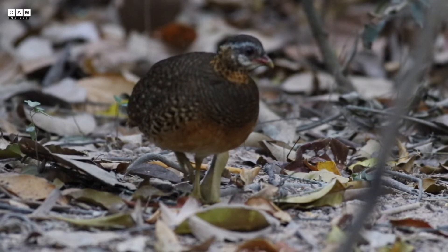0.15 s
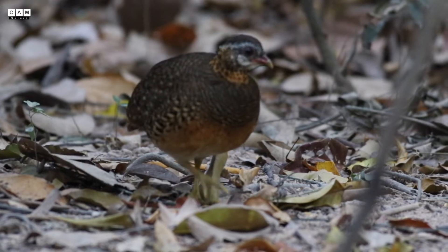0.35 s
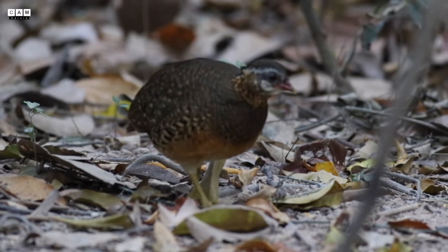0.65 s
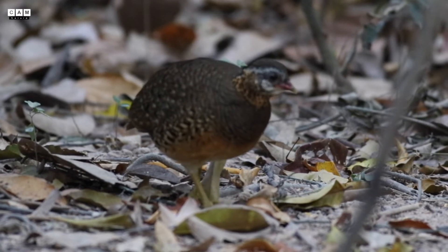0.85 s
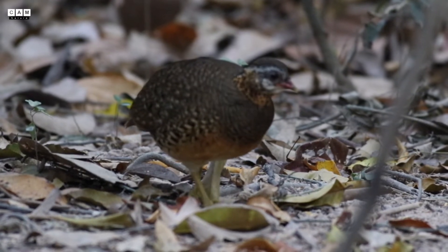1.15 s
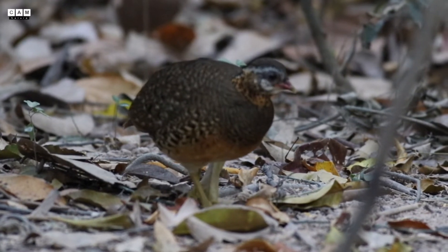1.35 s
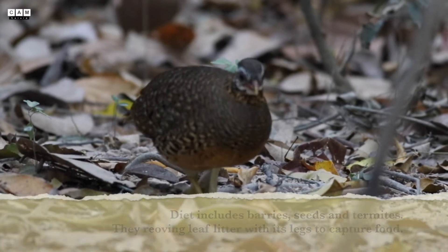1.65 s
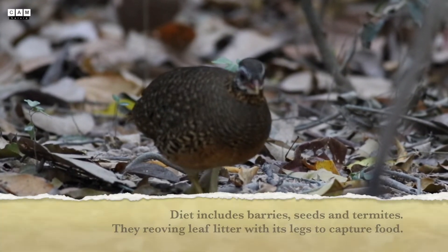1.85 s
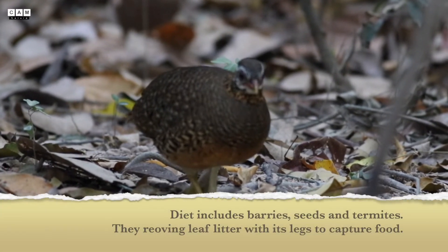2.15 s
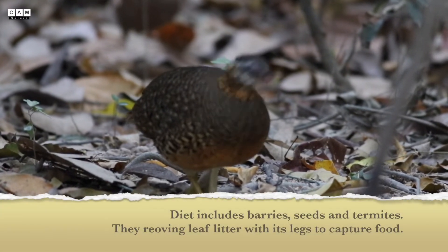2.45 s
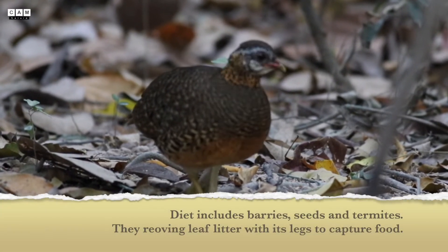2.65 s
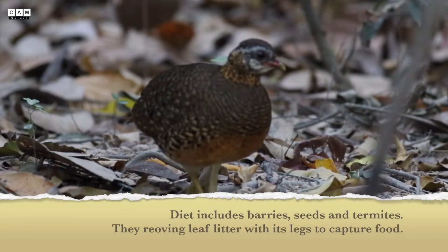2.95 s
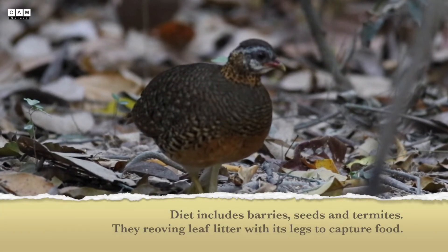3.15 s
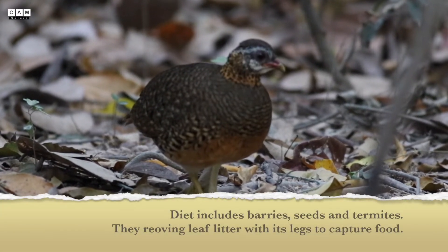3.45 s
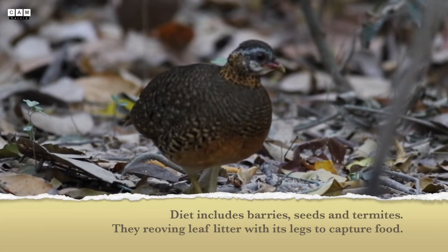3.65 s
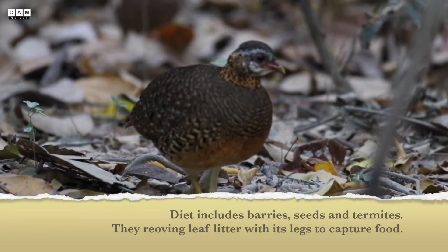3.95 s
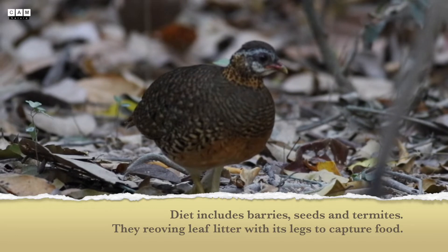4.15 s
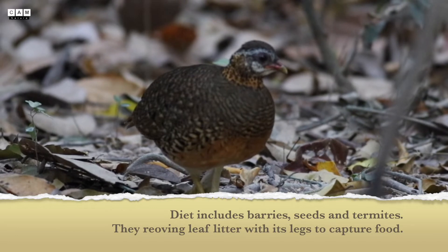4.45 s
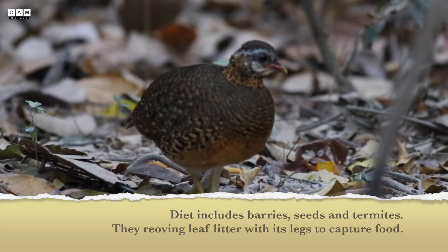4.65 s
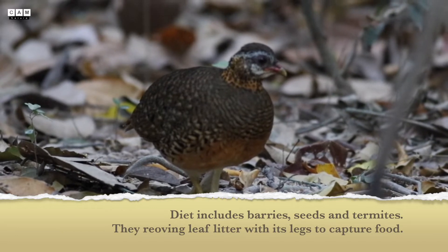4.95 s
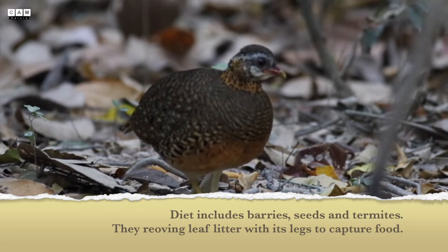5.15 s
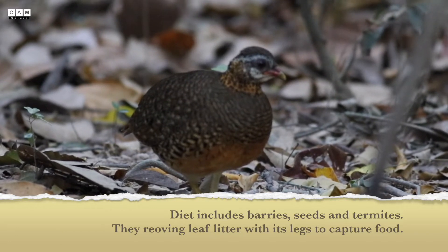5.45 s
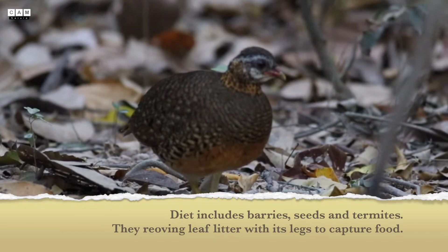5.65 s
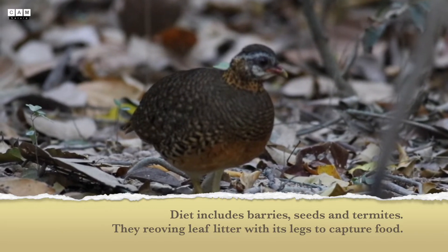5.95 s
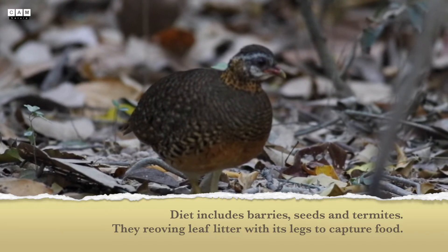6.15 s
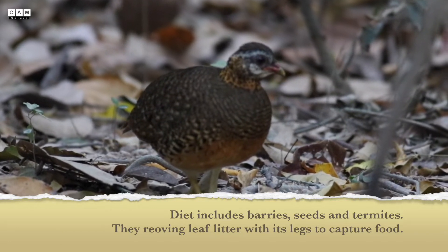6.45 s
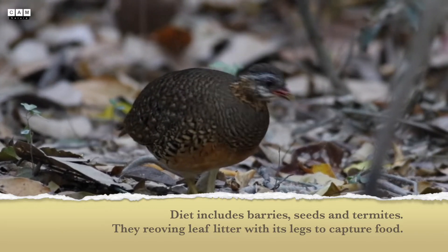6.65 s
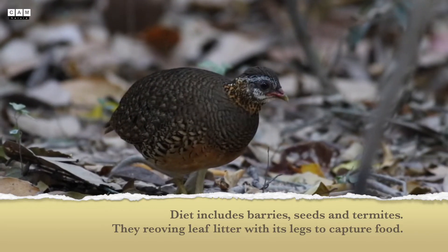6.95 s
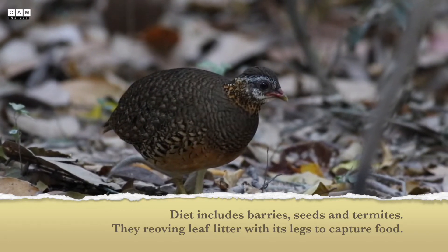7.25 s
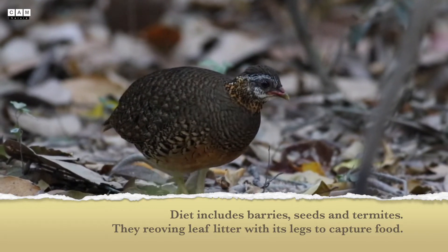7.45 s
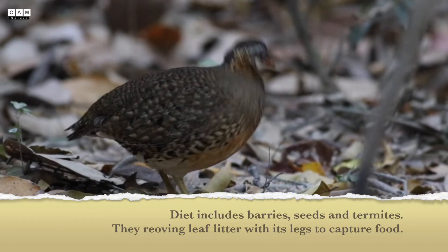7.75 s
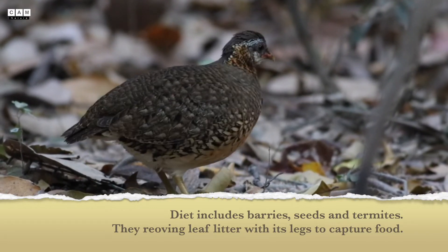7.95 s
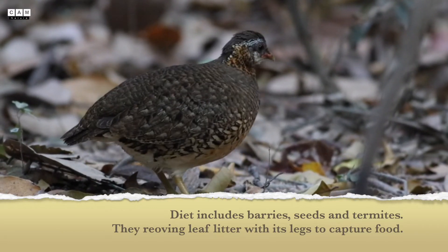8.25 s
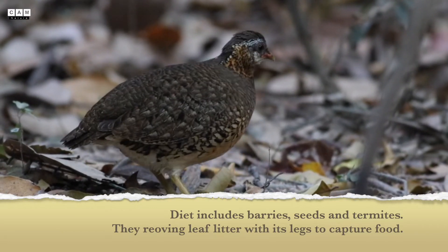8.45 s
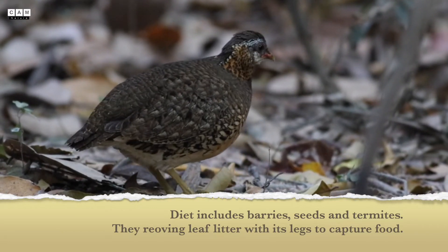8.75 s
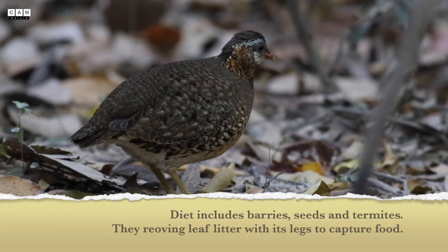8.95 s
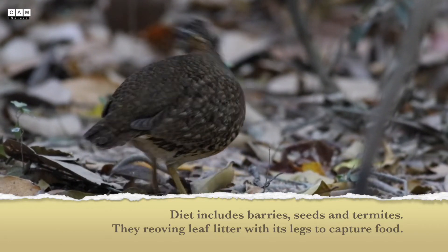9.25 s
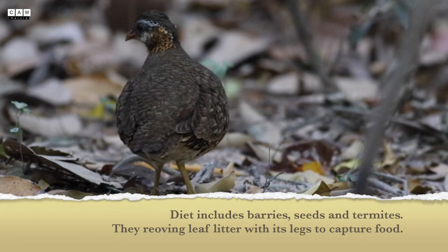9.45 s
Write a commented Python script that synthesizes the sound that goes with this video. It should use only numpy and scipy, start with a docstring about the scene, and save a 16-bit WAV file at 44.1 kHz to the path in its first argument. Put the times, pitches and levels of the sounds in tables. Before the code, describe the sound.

Birds call in quick short notes throughout, echoing in dense forest over a soft low rumble of air and a faint whine of far insects. A near bird whistles six low two-note phrases between 0.3 and 4.8 seconds, then three slightly higher pairs from 5.2 to 6.4. Others answer with hoarse slurs, gliding whistles and chirps. A high rising and falling sweep sounds at the start and at 3.5 seconds. Distant rasps and chatter thicken around 5.5 to 7.3 seconds. A high, rapidly pulsing insect whine swells from about 1 second, holds steady and stops dead at 7. Dry leaves snap close by, sharpest at about 2 and 3.4 seconds, with another clear snap near 5, among soft taps and faint high hisses. Scattered whistles, chirps and light taps continue, thinning toward the end at about 9.5 seconds.

```python
"""Songbirds call back and forth in dense forest: low whistled pairs, harsher slurs and high sweeps.
Whistles are gliding, nearly pure tones, rasps are noise in a throat resonance, and the trunks scatter
them all. An insect pulses near 7 kHz, once a wing stroke, and stops dead, leaving a far chorus.
Dry leaf litter snaps and taps close by; faint high hisses come and go over a low rumble of air."""
import sys
import numpy as np
from scipy import signal
from scipy.fft import rfft, irfft, next_fast_len
from scipy.io import wavfile
from scipy.ndimage import uniform_filter1d

SR = 44100
rng = np.random.default_rng(int(sys.argv[2]) if len(sys.argv) > 2 else 0)


def log_audio(samples):
    """Write samples as a 16-bit WAV file to the path given in sys.argv[1]."""
    # one column per channel
    frames = np.atleast_2d(samples).T
    # limit to full scale, then quantise
    limited = np.clip(frames, -1, 1)
    pcm = np.round(limited * 32767).astype(np.int16)
    wavfile.write(sys.argv[1], SR, pcm)


N = 422919
TIME = np.arange(N) / SR


# Two-note motifs, low (sinking, lifted) and high (rising, held), before each call retunes them:
# delay/s, length/s, f/Hz at four even steps through the note, relative level/dB
LOW_MOTIF = [(0, .135, 1275, 1155, 1150, 1024, 0), (0.139, .108, 1336, 1520, 1510, 1410, 1.5)]
HIGH_MOTIF = [(0, .08, 1313, 1427, 1462, 1390, -1.5), (.097, .09, 1567, 1594, 1526, 1530, 0.85)]
# Low calls: t/s, pitch factor of note one, of note two, level/dB before trim
LOW_CUES = [(.26, 1.12, 0.99, -43), (1.055, 0.96, 0.97, -42.5), (1.98, 1, 0.97, -43.5),
            (2.5, 0.97, 0.95, -43), (3.53, 1.015, 1.02, -43), (4.49, 0.99, 0.96, -43)]
# High calls: t/s, pitch factor, level/dB before trim
HIGH_CUES = [(5.215, 1, -40), (5.705, 1, -40.5), (6.2, 0.99, -40.5)]

def whistler():
    """The lead voice: a near bird whistles clean pairs of notes."""
    notes = phrases(LOW_CUES, LOW_MOTIF) + phrases(HIGH_CUES, HIGH_MOTIF)
    voice = song(notes, waver=.016, flutter=.35, taper=.2, octave_db=-38)
    return forest(gain_of(-.7) * voice, wet_db=-7.5, near_db=-4, near_s=.028)


# Answering slurs: t/s, length/s, starting f/Hz, level/dB before trim
SLUR_CUES = [(.01, 0.096, 1770, -48.5), (0.132, 0.087, 1753, -51.5), (0.313, 0.13, 2100, -47.5),
             (1.557, 0.073, 1742, -52), (1.819, 0.1, 1743, -53), (2.51, 0.1, 1747, -52),
             (2.828, 0.1, 1810, -51), (3.087, 0.11, 1866, -50), (3.22, 0.087, 1855, -50.5),
             (3.576, 0.12, 1890, -53.5), (3.818, 0.095, 1815, -53), (4.144, 0.07, 1810, -49),
             (4.201, 0.069, 1781, -51.5), (4.728, 0.1, 1736, -50), (5.6, 0.068, 1710, -47),
             (6.231, 0.11, 1768, -53.5), (6.455, 0.075, 1795, -52.5), (6.959, 0.1, 1696, -52),
             (8.637, 0.093, 2036, -53.5)]

def answering_bird(dive_per_s3=153.6):
    """Each hoarse slur starts flat and loses pitch with the cube of time."""
    progress = np.linspace(0, 1, 4)
    notes = [(s, length, *(hz * (1 - dive_per_s3 * (progress * length) ** 3)), db)
             for s, length, hz, db in SLUR_CUES]
    voice = song(notes, waver=.0259, flutter=.28, taper=.025, octave_db=-41)
    return forest(gain_of(4) * voice, wet_db=-3.5, near_db=-5.5, near_s=.09)


# Canopy whistles: t/s, length/s, held f/Hz, starting offset/share of f, waver/share of f,
# level/dB before trim
GLIDE_CUES = [(0.068, 0.084, 2335, 0.04, 0.0082, -45.5), (0.612, 0.038, 2507, -0.13, 0.0097, -45),
              (0.697, 0.19, 2461, -0.18, .012, -45), (1.021, 0.17, 2104, -0.27, 0.023, -46),
              (1.86, 0.23, 2447, -0.074, 0.013, -46.5), (2.018, 0.077, 2260, 0.04, 0.016, -47.5),
              (2.395, 0.12, 1926, -0.049, .008, -52), (2.774, .18, 2434, -.2, .018, -45),
              (3.014, 0.21, 2207, -0.073, 0.0094, -45.5), (4.765, .12, 2482, 0.083, 0.014, -44),
              (4.877, 0.12, 1905, 0.23, 0.023, -48), (5.306, 0.077, 2144, 0.073, 0.029, -42),
              (5.633, 0.19, 1930, -0.066, .015, -50), (7.43, 0.19, 2300, -.11, 0.0076, -47.5),
              (7.5, 0.144, 4190, -0.04, 0.014, -50), (7.916, 0.15, 2100, 0.13, 0.016, -45.5),
              (8.257, 0.11, 2280, 0.031, 0.027, -42.5), (8.479, 0.18, 1849, -0.16, .025, -50.5),
              (8.528, 0.11, 3315, -0.0014, 0.009, -53)]

def canopy_glides(settle_s=.11):
    """Each whistle slides in from above or below and flattens out on its held pitch."""
    progress = np.linspace(0, 1, 7)
    notes, wavers = [], []
    for s, length, hz, offset, waver, db in GLIDE_CUES:
        slide = np.maximum(1 - progress * max(length / settle_s, 1), 0) ** 2
        notes.append((s, length, *(hz * (1 + offset * slide)), db))
        wavers.append(waver)
    voice = song(notes, waver=wavers, flutter=.35, taper=.17, octave_db=-32)
    return forest(gain_of(.13) * voice, wet_db=-4.5, near_db=-3, near_s=.05)


# Quick chirps: t/s, length/s, starting f/Hz, final f/Hz, level/dB before trim
CHIRP_CUES = [(0, 0.091, 2803, 2460, -44.5), (0.1, 0.03, 1527, 1253, -42.5),
              (1.543, 0.082, 1988, 3580, -45.5), (2.925, 0.041, 2965, 3280, -53),
              (3.289, 0.051, 1740, 1243, -41.5), (4.274, 0.039, 1668, 1210, -41),
              (6.64, 0.032, 2305, 1890, -48.5), (6.885, 0.052, 1980, 2190, -49),
              (6.938, 0.068, 1908, 2600, -45), (6.977, .032, 3045, 3450, -44.5),
              (7.209, 0.03, 3160, 3320, -48), (7.24, 0.046, 3107, 2420, -43),
              (7.338, 0.036, 2700, 2336, -48), (8.159, .065, 1633, 1346, -54.5),
              (8.542, 0.047, 3300, 2900, -46), (8.713, 0.068, 1765, 1426, -51.5)]

def chirps(bow=.12):
    """Each chirp leaps along a slight arch: falling ones speed up, rising ones ease off."""
    notes = [(s, length, start, (start + end) / 2 + bow * abs(end - start), end, db)
             for s, length, start, end, db in CHIRP_CUES]
    voice = song(notes, waver=.027, flutter=.23, taper=.091, octave_db=-24)
    return forest(gain_of(-.5) * voice, wet_db=-3.5, near_db=-1, near_s=.048)


# A long, high two-note sweep: columns as in LOW_MOTIF
ARCH_MOTIF = [(0, .22, 2850, 3267, 3430, 3347, -3), (.26, .235, 3300, 3156, 2927, 2510, 2)]
# Its calls: t/s, pitch factor, level/dB before trim
ARCH_CUES = [(-.025, 0.99, -49), (3.5, 0.97, -47)]

def canopy_arches():
    """A canopy bird sweeps up on one note and slowly down on the next."""
    notes = phrases(ARCH_CUES, ARCH_MOTIF)
    voice = song(notes, waver=.0048, flutter=.34, taper=.18, octave_db=-30, strain_s=.0006)
    return forest(gain_of(-1.4) * voice, wet_db=-3, near_db=1, near_s=.026)


# Hoarse churrs: t/s, length/s, centre f/Hz, level/dB before trim
CHURR_CUES = [(1.14, 0.035, 2680, -52.5), (2.17, 0.039, 2900, -56), (4.35, 0.041, 2340, -49.5),
              (4.44, 0.032, 2740, -48), (4.485, 0.048, 2130, -48), (4.89, 0.05, 2380, -48),
              (5.05, 0.12, 2360, -55.5), (7.02, .04, 3370, -51.5), (7.825, 0.034, 2690, -49.5),
              (7.85, 0.04, 2380, -49), (7.99, .07, 3650, -54), (8.46, 0.054, 1740, -52.5),
              (8.795, 0.034, 2830, -47.5), (9.065, 0.075, 2500, -57), (9.4, 0.048, 2460, -56.5)]

def churrs():
    """Short bursts of noise in one resonance of the throat."""
    return gain_of(4) * noise_bursts(CHURR_CUES, width_hz=167)


# A far bird's rasps: t/s, length/s, centre f/Hz, width/Hz, lower resonance/dB re the main one,
# level/dB before trim
BUZZ_CUES = [(0, .12, 4220, 480, 0, -46.5), (1.408, 0.14, 4190, 456, -0.5, -47.5),
             (2.118, 0.16, 4205, 502, 0, -47.5), (3.715, .15, 4080, 480, -1.5, -47),
             (5.586, 0.1, 4380, 400, 0, -48), (5.945, 0.13, 4150, 200, -2, -48),
             (6.111, 0.11, 4186, 223, -8, -46), (6.202, .12, 4760, 376, -1, -48),
             (6.339, 0.11, 4045, 230, -6, -44.5), (6.536, 0.11, 4070, 203, -5, -46.5),
             (6.755, .12, 3900, 193.4, -8, -46.5), (7.041, 0.118, 4070, 192, -2, -48),
             (7.947, .12, 4500, 396, -7, -47), (9.355, .13, 4200, 485, -3, -49.5)]

def buzzes(lower_ratio=.72, rise_widths=1.2):
    """A rasp swells and fades while its resonance, and a second one below it, climb."""
    out = np.zeros(N)
    for s, length, hz, width_hz, lower_db, db in BUZZ_CUES:
        progress = TIME[:int(length * SR)] / length
        phase = 2 * np.pi * np.cumsum(hz + rise_widths * width_hz * (progress - .5)) / SR
        main = band_noise(len(phase), 0, width_hz) * np.sin(phase)
        lower = gain_of(lower_db) * band_noise(len(phase), 0, width_hz) * np.sin(phase * lower_ratio)
        add(out, s, gain_of(db) * unit_rms((main + lower) * np.sin(np.pi * progress)))
    return gain_of(-6) * out


# The near insect's fader and pitch: t/s, level/dB, carrier f/Hz
INSECT_CURVE = [(0, -63, 6680), (0.801, -59.5, 6650), (1.198, -55, 6646), (2.1, -52.5, 6766),
                (3, -52.5, 6752), (6.99, -52.5, 6730)]
# Its wings hurry as it warms up and tire before it stops: t/s, stroke rate/Hz
STROKE_RATE = [(0, 42.6), (1.2, 42.6), (1.8, 42.35), (2.5, 42.88), (3.2, 42.7), (5, 42.6), (7, 42.25)]

def insect(stop_s=6.995, pulse_width=.09, sag_hz=1400):
    """One short pulse a wing stroke, its pitch sagging as it sounds."""
    s, db, hz = np.transpose(INSECT_CURVE)
    stroke = (np.cumsum(automation(STROKE_RATE)) / SR + .21) % 1 - .5  # zero at the pulse's peak
    unevenness = np.exp(.19 * band_noise(N, 0, 33))
    pulse = unit_rms(np.exp(-.5 * (stroke / pulse_width) ** 2) * unevenness)
    jitter = .3 * band_noise(N, 0, 130)
    pitch_hz = np.interp(TIME, s, hz) + 5 * band_noise(N, 0, 14) - sag_hz * stroke
    phase = 2 * np.pi * np.cumsum(pitch_hz) / SR + jitter
    tone = np.sqrt(2) * (np.sin(phase) + gain_of(-26) * np.sin(2 * phase))
    wing_scrape = gain_of(-23) * band_noise(N, 21400, 1000)  # lies above the final low-pass
    call = gain_of(np.interp(TIME, s, db)) * (pulse * tone + wing_scrape) * (TIME < stop_s)
    return forest(call, wet_db=-13, near_db=-10, near_s=.015)


# Dry leaf snaps: t/s, peak level/dB, body near 2 kHz/dB re the treble
SNAP_CUES = [(.328, -31, -14), (1.721, -37.5, -18), (2.023, -22, 3), (3.247, -37, -5), (3.368, -23.5, 11.5),
             (3.721, -44, -7), (3.844, -32, -6), (4.179, -32, 5), (4.379, -37, -12), (5.107, -28.5, -2),
             (5.54, -43, -12), (6.126, -37, -7), (7.418, -37.5, -16), (7.836, -39.5, -14)]
# Soft taps on the litter: t/s, peak level/dB, f/Hz
TAP_CUES = [(1.924, -38, 1070), (2.965, -45, 622), (3.368, -41, 870), (6.033, -43.5, 784),
            (6.787, -42.5, 850), (7.524, -46, 940), (7.93, -37.5, 780), (8.144, -39.5, 1000),
            (8.859, -46, 596), (9.15, -48, 930), (9.393, -41.5, 850)]

def litter(snap_s=.0016, crumble_s=.008, tap_s=.0036):
    """Leaves crack with a short crumble after; taps are dull, quickly damped knocks."""
    out, t = np.zeros(N), TIME[:SR // 10]
    decay = np.exp(-t / snap_s) + gain_of(-15) * np.exp(-t / crumble_s)
    for s, db, body_db in SNAP_CUES:
        treble = band_noise(len(t), 4880, 2320) + .14 * band_noise(len(t), 13000, 2500)
        body = gain_of(body_db) * band_noise(len(t), 2020, 910)
        crack = (treble + body) * decay
        add(out, s, gain_of(db) * crack / abs(crack).max())
    for s, db, hz in TAP_CUES:
        knock = band_noise(len(t), hz, .53 * hz) * t * np.exp(-t / tap_s)
        add(out, s, gain_of(db) * knock / abs(knock).max())
    return forest(out, wet_db=-22, near_db=-10, near_s=.012)


# Faint high hisses: t/s, length/s, level/dB
HISS_CUES = [(0.096, 0.41, -63.5), (3.228, .22, -70), (6.092, 0.085, -63), (6.438, 0.16, -63),
             (6.768, 0.15, -59), (7.8, 0.5, -66.5)]

def high_hisses(centre_hz=7100, width_hz=1500, ticks_per_s=25, tick_s=.005):
    """Faint, short, grainy hisses near 7 kHz, over a fainter crinkle of random ticks."""
    hisses = noise_bursts([(s, length, centre_hz, db) for s, length, db in HISS_CUES], width_hz)
    ticks = (rng.random(N) < ticks_per_s / SR) * gain_of(12 * rng.random(N))
    tick_decays = signal.lfilter([1], [1, -np.exp(-1 / (tick_s * SR))], ticks)
    crinkle = tick_decays * band_noise(N, centre_hz, width_hz)
    grain = unit_rms(np.exp(.15 * band_noise(N, 0, 83)))
    return hisses * grain + gain_of(-75) * unit_rms(crinkle)


# The distant flock's fader: t/s, level/dB before trim
FLOCK_FADER = [(0, -68), (5.2, -54.5), (6.2, -50.5), (7.3, -52), (9.59, -63.5)]

def flock(count=260):
    """Far birds: many short chance glides that blur into chatter."""
    when, length, pitch, slope, softness = rng.random((count, 5)).T
    hz = 1600 * 1.9 ** pitch
    fall = .3987 * (slope - .5)
    pitches = hz * (1 + fall), hz, hz * (1 - fall)
    notes = np.transpose([when * TIME[-1], .036 + .07 * length, *pitches, -8 * softness])
    chatter = song(notes, waver=.04, flutter=.3, taper=.5, octave_db=-40)
    return gain_of(automation(FLOCK_FADER) - 4) * unit_rms(chatter)


# The far insects' fader: t/s, level/dB
CHORUS_FADER = [(0, -58), (.8, -58), (1, -57), (2.5, -54.5), (3, -60), (7.2, -65), (8.2, -62),
                (9.59, -64.5)]

def insect_chorus():
    """Many far insects blur into a narrow whine."""
    whine = band_noise(N, 6670, 100) + .75 * band_noise(N, 6530, 260)
    return gain_of(automation(CHORUS_FADER)) * unit_rms(whine)


# The bed's EQ, still forest air and far insect hiss: f/Hz, relative level/dB
AIR_EQ = [(20, -12.5), (60, 3), (100, -3), (200, -11.5), (400, -17), (900, -17), (1700, -12.5),
          (3500, -18.5), (4500, -12), (5600, -22), (7400, -28), (10500, -44), (14000, -36), (16000, -37.5)]

def air(level_db=-51, patchy_db=1.4, steady_below_hz=300):
    """A steady low rumble, and far hiss drifting in soft patches."""
    frames, hz = N // 512 + 5, np.fft.rfftfreq(2048, 1 / SR)
    real, imaginary, patches = rng.standard_normal((frames, len(hz), 3)).T
    patches = uniform_filter1d(patches, size=24, axis=0)  # smooth across frequency
    patches = unit_rms(uniform_filter1d(patches, size=12, axis=1))  # and across time
    drift_db = (patchy_db * hz / (hz + steady_below_hz))[:, None] * patches
    spectrum = (real + 1j * imaginary) * gain_of(curve_at(AIR_EQ, hz)[:, None] + drift_db)
    return gain_of(level_db) * unit_rms(signal.istft(spectrum, nperseg=2048, noverlap=1536)[1][:N])


# How long the trees ring: f/Hz, t60/s
FOREST_DECAY = [(500, 0.17), (1200, 1.36), (1800, 1.9), (2500, 1.3), (4000, 1.68), (8000, 0.55)]

def forest(x, wet_db, near_db, near_s):
    """Direct sound, a quick cluster of echoes from near trunks, and the long scatter of the wood."""
    t = TIME[:SR]
    build_up = np.clip((t - .008) / .025, 0, 1)
    echoes = rng.standard_normal(SR) * (rng.random(SR) < 2500 / SR) * build_up
    hz, age, spectrum = signal.stft(echoes, SR, nperseg=256)
    decay = gain_of(-60 * age / curve_at(FOREST_DECAY, hz)[:, None])
    tail = signal.istft(spectrum * decay, SR, nperseg=256)[1][:SR]
    tail /= np.linalg.norm(echoes * gain_of(-60 * t))  # unit energy for a t60 of 1 s
    near = rng.standard_normal(SR) * (rng.random(SR) < 900 / SR) * np.exp(-t / near_s)
    response = gain_of(wet_db) * tail + gain_of(near_db) * near / np.linalg.norm(near)
    response[0] += 1  # the direct sound
    return signal.fftconvolve(x, response)[:N]


def song(notes, waver, flutter, taper, octave_db, strain_s=0):
    """Gliding bird tones: waver shakes the pitch, flutter the level; strain roughens fast leaps."""
    out = np.zeros(N)
    for (s, length, *pitches, db), note_waver in zip(notes, np.resize(waver, len(notes))):
        progress = TIME[:int(length * SR)] / length
        glide = np.polyfit(np.linspace(0, 1, len(pitches)), pitches, len(pitches) - 1)
        tremble, unsteady = (band_noise(len(progress), 0, hz) for hz in (70, 40))
        hoarse = note_waver + strain_s * np.ptp(pitches) / np.mean(pitches) / length
        phase = 2 * np.pi * np.cumsum(np.polyval(glide, progress) * (1 + hoarse * tremble)) / SR
        swell = np.sin(np.pi * progress) ** taper
        tone = np.sin(phase) + gain_of(octave_db) * np.sin(2 * phase)
        add(out, s, gain_of(db) * unit_rms(tone * swell * np.exp(flutter * unsteady)))
    return out


def phrases(cues, motif):
    """The same motif at every cue, louder or softer, retuned as a whole or note by note."""
    return [(s + delay, length, *(factor * np.array(pitches)), db + note_db)
            for s, *factors, db in cues
            for factor, (delay, length, *pitches, note_db) in zip(np.resize(factors, len(motif)), motif)]


def noise_bursts(cues, width_hz):
    """One band of noise a cue, faded in and out."""
    out = np.zeros(N)
    for s, length, hz, db in cues:
        fade = signal.windows.tukey(int(length * SR), .5)
        add(out, s, gain_of(db) * band_noise(SR // 2, hz, width_hz)[:len(fade)] * fade)
    return out


def band_noise(size, centre_hz, width_hz):
    """Noise under a bell-shaped band; centred on zero it is a slow wander."""
    length = next_fast_len(size + 4096)
    bell = np.exp(-.5 * ((np.fft.rfftfreq(length, 1 / SR) - centre_hz) / width_hz) ** 2)
    return unit_rms(irfft(rfft(rng.standard_normal(length)) * bell, length))[:size]


def gain_of(db):
    """Decibels to amplitude."""
    return 10 ** (np.asarray(db) / 20)


def unit_rms(x):
    """Scaled to an rms of 1."""
    return x / np.sqrt(np.mean(x ** 2) + 1e-20)


def automation(points):
    """Straight ramps between (time, value) points."""
    return np.interp(TIME, *np.transpose(points))


def curve_at(points, hz):
    """A table read on a log-frequency axis."""
    f, value = np.transpose(points)
    return np.interp(np.log(hz + 1), np.log(f + 1), value)


def add(mix, s, sound):
    """Mixes a sound in at time s; one cued before zero is joined midway."""
    start = round(s * SR)
    sound = sound[max(-start, 0):]
    part = mix[max(start, 0):][:len(sound)]
    part += sound[:len(part)]


def scene():
    """The mono mix; the rasping birds and the flock sit farthest back, with the most scatter."""
    whistles = whistler() + answering_bird() + canopy_glides() + chirps() + canopy_arches()
    far_birds = forest(churrs() + buzzes() + flock(), wet_db=-2.5, near_db=-1, near_s=.075)
    return (whistles + far_birds + insect() + litter() + high_hisses() + insect_chorus() + air())[None]


def record(dry):
    """A steep low-pass at 15.8 kHz on the whole mix."""
    low_pass = signal.firwin(511, 15800, window=("kaiser", 9), fs=SR)
    return signal.oaconvolve(dry, low_pass[None], "same")


dry = scene()
out = record(dry)
log_audio(out)
```